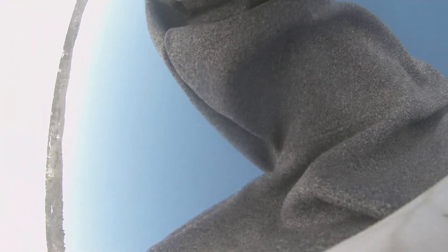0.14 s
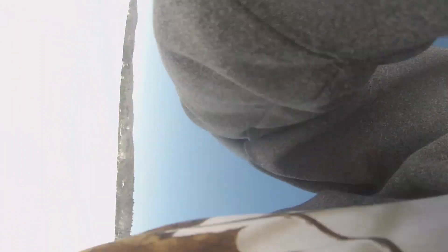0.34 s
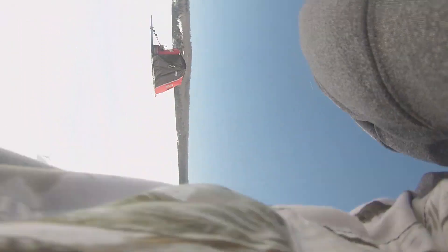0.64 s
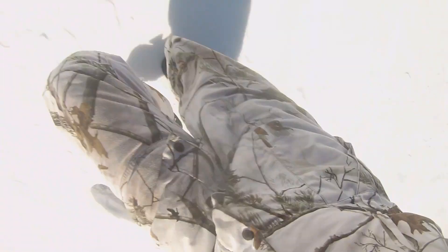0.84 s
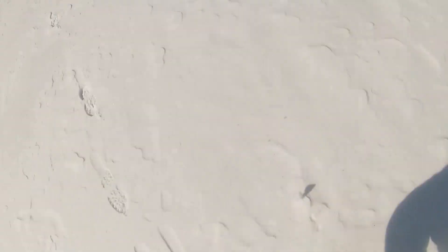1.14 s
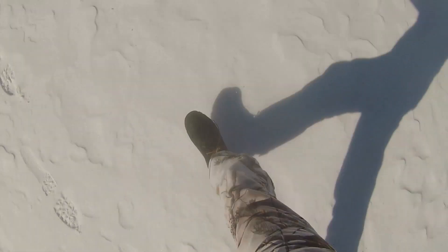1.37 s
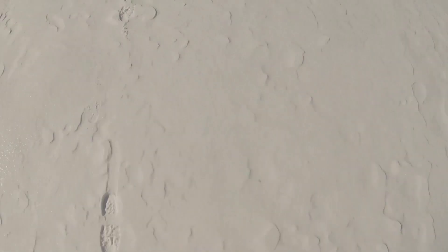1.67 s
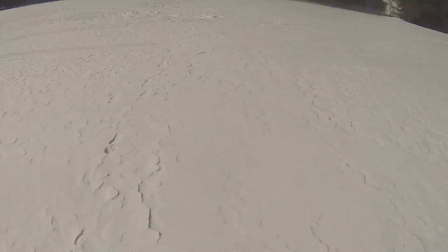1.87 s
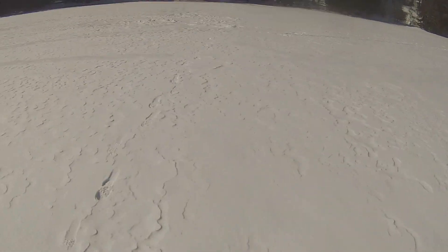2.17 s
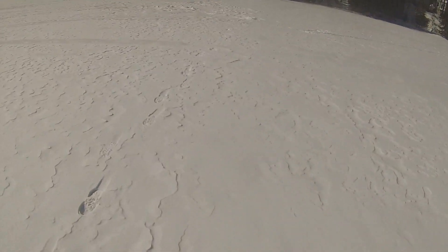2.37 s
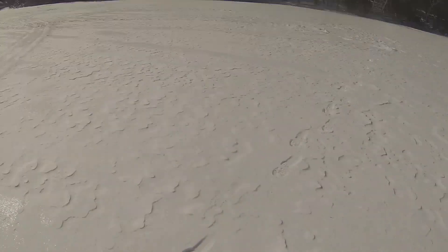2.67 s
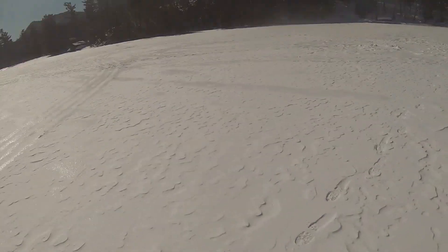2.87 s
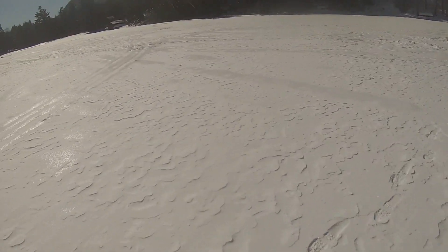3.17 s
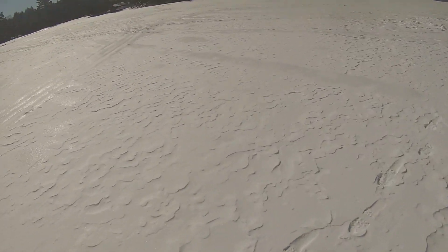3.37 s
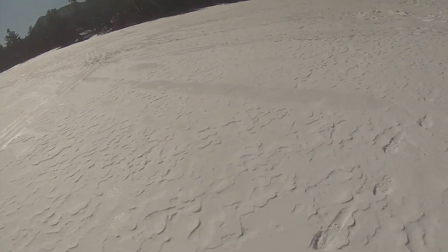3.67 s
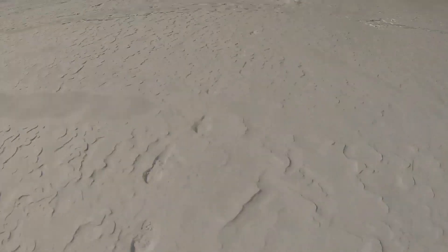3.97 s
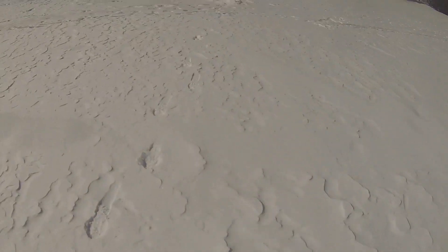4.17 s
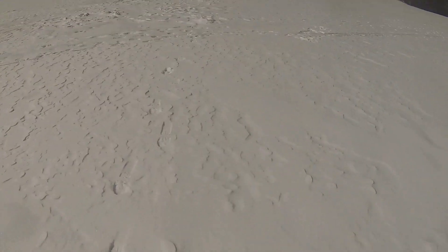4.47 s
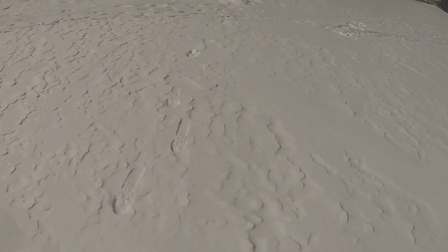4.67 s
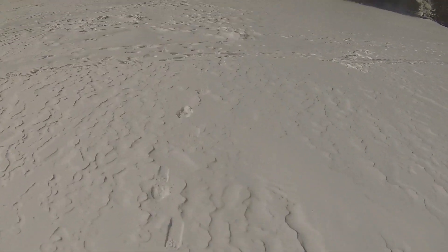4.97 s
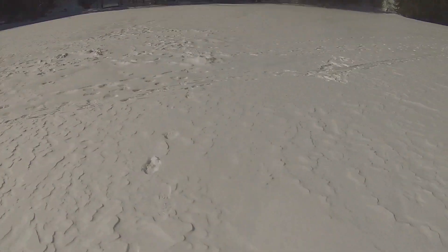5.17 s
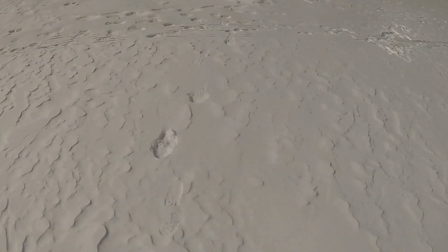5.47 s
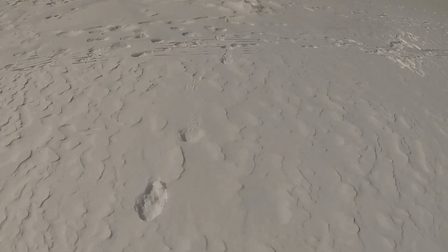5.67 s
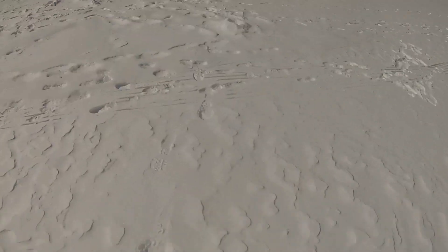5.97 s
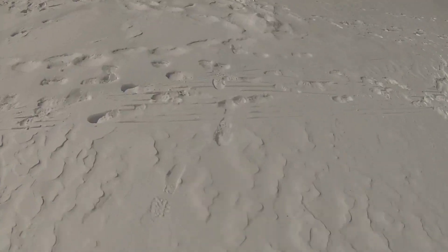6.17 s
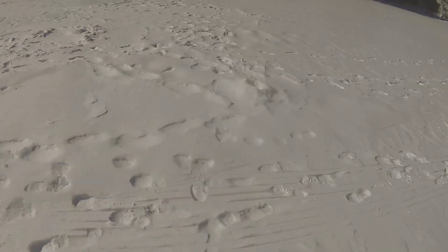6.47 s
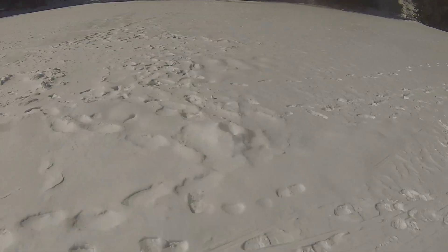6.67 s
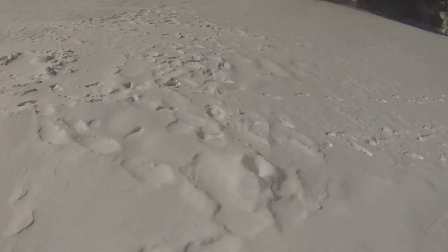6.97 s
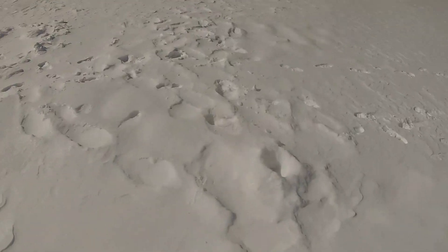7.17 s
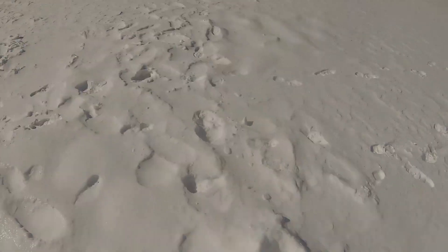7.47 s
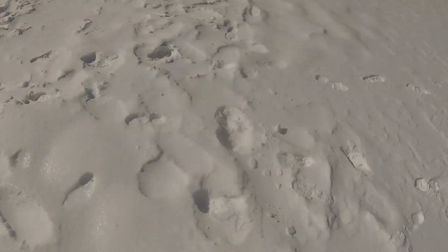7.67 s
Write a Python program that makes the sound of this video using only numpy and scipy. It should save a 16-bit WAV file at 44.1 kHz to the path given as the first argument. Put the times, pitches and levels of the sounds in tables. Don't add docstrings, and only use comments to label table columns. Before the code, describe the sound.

Close, boxy handling clatter and cloth rustle for two seconds, then uneven crunching steps on icy snow crust with low wind buffeting and sleeve swishes.

```python
import sys
import numpy as np
from scipy import signal
from scipy.fft import rfft, irfft, next_fast_len
from scipy.io import wavfile
from scipy.ndimage import uniform_filter1d

SR = 44100
rng = np.random.default_rng(int(sys.argv[2]) if len(sys.argv) > 2 else 0)


def put_to_file(sound):
    columns = np.atleast_2d(sound).T
    safe = np.clip(columns, -1, 1)
    whole_steps = np.round(safe * 32767)
    wavfile.write(sys.argv[1], SR, whole_steps.astype(np.int16))


def field_ratio(decibels):
    return 10 ** (np.asarray(decibels, dtype=float) / 20)


N = 345744


def evened(x):
    return x / np.sqrt(np.mean(x ** 2) + 1e-20)


def coloured(x, points):
    hz, db = np.transpose(points)
    size = next_fast_len(len(x))
    bins_hz = np.fft.rfftfreq(size, 1 / SR)
    gain = field_ratio(np.interp(np.log(bins_hz + 1), np.log(hz + 1), db))
    return evened(irfft(rfft(x, size) * gain, size)[:len(x)])


def curve_db(rows, column=1):
    columns = np.transpose(rows)
    return np.interp(np.arange(N) / SR, columns[0], columns[column])


def lumps(hz, db):
    lowpass = signal.butter(2, hz, fs=SR, output="sos")
    slow = signal.sosfilt(lowpass, rng.standard_normal(N))
    return evened(field_ratio(db * evened(slow)))


def patchy(x, db):
    spectrum = signal.stft(x, nperseg=256, noverlap=192)[2]
    field = rng.standard_normal(spectrum.shape)
    for bins, frames in [(5, 24), (3, 12)]:
        field = uniform_filter1d(uniform_filter1d(field, size=bins, axis=0), size=frames, axis=1)
    shaded = spectrum * field_ratio(db * evened(field))
    return evened(signal.istft(shaded, nperseg=256, noverlap=192)[1][:N])


def grains(per_s, spread_db):
    size = field_ratio(spread_db * np.minimum(rng.exponential(1, N), 4))
    return size * rng.standard_normal(N) * (rng.random(N) < per_s / SR)


def add(mix, s, sound, early=0):
    part = mix[max(round((s - early) * SR), 0):][:len(sound)]
    part += sound[:len(part)]


def wavelet(hz, cycles, phase):
    u = np.arange(1500) / SR * hz / cycles
    return (u * np.exp(1 - u)) ** 2 * np.sin(2 * np.pi * (u * cycles + phase))


# time in seconds, level in dB, deep share in dB.
WIND = [(0.0, -36.5, -7), (0.05, -30, -2), (0.3, -25.5, -3), (0.62, -34, 0), (0.84, -36, -0.5),
        (1.14, -45, -3), (1.58, -38, 1), (1.74, -36.5, 9.5), (1.88, -44, 5.5), (2.6, -37.5, 1),
        (2.98, -28, -6.5), (3.84, -29, -7.5), (4.54, -33, 0), (5.2, -39, 4), (5.5, -31, 1),
        (6.06, -28.5, -2.5), (6.64, -33.5, -1), (7.64, -24.5, -2)]
# middle in seconds, depth in dB, half length in seconds.
LULLS = [(0.176, 4.5, .1), (0.433, 11.5, 0.18), (0.986, 23, 0.12), (1.23, 20, 0.044), (1.357, 15, 0.24),
         (1.649, 30, 0.066), (1.802, 6, 0.061), (2.077, 11, 0.087), (2.476, 5.5, 0.089), (2.735, 16, 0.057),
         (2.836, 7, 0.12), (3.148, 7.5, 0.14), (3.512, 13.5, 0.23), (3.916, 29, 0.051), (4.01, 24.5, 0.096),
         (4.356, 13.5, 0.11), (5.074, 8, 0.13), (5.718, 8.5, 0.27), (5.816, 12, 0.12), (5.922, 8.5, 0.15),
         (6.23, 5.5, 0.15), (6.554, 14, 0.18), (7.333, 14, 0.14), (7.472, 9.5, 0.086), (7.788, 9.5, 0.23)]


def gusts():
    t = np.arange(N) / SR
    notches = sum(db * np.interp(t, [s - half, s, s + half], [0, 1, 0]) for s, db, half in LULLS)
    return curve_db(WIND) - notches


# frequency in Hz, density in dB per Hz.
WIND_COLOUR = [(12, -41), (20, -4), (48, 1.5), (83, -2), (155, -7), (414, -22), (513, -26.5), (600, -27),
               (780, -68), (1320, -120)]
# frequency in Hz, density in dB per Hz.
ROAR = [(180, -13), (300, -4.5), (614, -9.5), (725, -0.5), (1250, -16.5), (2070, -15.5), (2360, -11.5),
        (3640, -20), (4020, -25.5), (5610, -21.5), (7080, -36.5), (13500, -46), (16000, -51)]
# frequency in Hz, density in dB per Hz.
AIR = [(4120, -16.5), (7000, -12), (8070, -11.5), (11900, -18.5), (14700, -21.5), (15300, -28),
       (15600, -40)]


def wind():
    z = signal.stft(rng.standard_normal(N), nperseg=2048, noverlap=1536)[2]
    z = z / uniform_filter1d(abs(z) ** 2, size=14, axis=1) ** 0.4
    eddies = coloured(signal.istft(z, nperseg=2048, noverlap=1536)[1][:N], WIND_COLOUR)
    deep = signal.sosfiltfilt(signal.butter(2, 76.4, fs=SR, output="sos"), eddies)
    eddies = eddies + (field_ratio(curve_db(WIND, column=2)) - 1) * deep
    gust_db = gusts()
    rumble = field_ratio(gust_db) * eddies * lumps(hz=25.5, db=3.0)
    swish = patchy(coloured(grains(per_s=8700, spread_db=0.0), ROAR), db=2.0) * lumps(hz=27.3, db=2.0)
    swish_db = -55 + 0.15 * (gust_db + 24.5)
    hiss = field_ratio(-78.5) * coloured(rng.standard_normal(N), AIR)
    return rumble + field_ratio(swish_db) * swish + hiss


def layered(rows, heavy_share, coarse_db, fizz_db, fizz_slope):
    s, length, heavy, fine = np.transpose(rows)
    muffled = heavy - 1.6 * np.maximum(heavy + 32.5, 0)
    coarse = heavy_share * muffled + (1 - heavy_share) * fine + coarse_db
    fizz = fizz_db - fizz_slope * (fine + 50)
    return np.transpose([s, length, heavy, coarse, fine, fizz])


# frequency in Hz, density in dB per Hz.
HOLLOW = [(160, -11.5), (280, -5), (440, 0), (473, 1), (576, -5.5), (806, 0.5), (904, -5), (1400, -33.5),
          (1820, -28.5), (3080, -120)]
# frequency in Hz, density in dB per Hz.
GRIT = [(680, -10), (1150, -5), (1990, -4), (2500, -2.5), (3400, -22.5), (5500, -69)]


def friction(spells, fine_colour, breaks_per_s, spread_db, patchy_db, sag_db, body_db, soft):
    body, coarse, fine, top = np.zeros((4, N))
    for s, length, heavy_level, coarse_level, fine_level, fizz_level in spells:
        length = max(length, 0.002)
        edge = 0.003 + soft * length
        t = np.arange(0, length + edge, 1 / SR)
        fade = np.sin(np.pi / 2 * np.clip(np.minimum(t, t[-1] - t) / edge, 0, 1))
        spell = fade * field_ratio(sag_db * (t / t[-1] - 0.5))
        start = s - edge / 2
        add(body, start, field_ratio(heavy_level + body_db) * spell)
        add(coarse, start, field_ratio(coarse_level - 6.0) * spell)
        add(fine, start, field_ratio(fine_level - 3.0) * spell)
        add(top, start, field_ratio(fine_level + fizz_level) * spell)
    breaks = evened(grains(breaks_per_s, spread_db))
    small = evened(grains(per_s=13000, spread_db=-1.5)) + 0.067 * spread_db * breaks
    low = body * coloured(breaks, HOLLOW) + coarse * coloured(breaks + 1.7 * small, GRIT)
    high = fine * patchy(coloured(small, fine_colour), patchy_db)
    fizz = top * patchy(coloured(small, AIR), db=3.0)
    return low + high + fizz


# frequency in Hz, density in dB per Hz.
WEAVE = [(1470, -12.5), (2600, -3), (3680, -3), (4240, -3.5), (4800, -9.5), (5760, -5), (7300, -33.5),
         (9490, -87), (16100, -120)]
# start in seconds, pressure
# in dB, slip in dB.
RUBS = [(0.0, -44, -50), (0.03, -39.5, -41), (0.162, -28.5, -37), (0.267, -26, -37.5), (0.326, -34, -26),
        (0.34, -27, -41), (0.351, -31, -31), (0.365, -38, -26), (0.418, -37, -34), (0.547, -37.5, -29),
        (0.592, -37, -33), (0.659, -31.5, -32), (0.704, -44, -28), (0.738, -37, -46.5),
        (0.771, -43.5, -51), (0.805, -33.5, -32), (0.844, -40, -34), (0.901, -53.5, -49),
        (0.995, -64, -61),
        (1.024, -43, -48.5), (1.06, -49, -57), (1.098, -33.5, -44), (1.125, -26.5, -35.5),
          (1.146, -36, -36), (1.187, -43.5, -45.5), (1.228, -40, -41), (1.239, -42.5, -42),
          (1.268, -43.5, -54), (1.315, -36, -34.5), (1.348, -43, -40.5), (1.371, -48, -53.5),
          (1.401, -37, -44), (1.479, -36, -40), (1.537, -32.5, -34), (1.571, -30.5, -44), (1.585, -45, -53),
          (1.626, -40, -42.5), (1.685, -39.5, -34), (1.712, -29.5, -26.5), (1.761, -30.5, -38.5),
          (1.789, -49, -54), (1.825, -27, -35), (1.835, -39.5, -37.5), (1.861, -53, -52.5),
          (1.89, -82, -82)]
# start in seconds, length in seconds, pressure in dB, slip in dB.
SWISHES = [(2.063, 0.062, -84, -57.5), (2.325, 0.024, -65, -67), (2.8, 0.077, -46.5, -59.5),
           (3.57, 0.087, -45.5, -60.5), (3.795, 0.041, -42, -53), (3.925, 0.099, -56, -61),
           (4.225, 0.031, -68, -54.5), (4.36, 0.06, -43.5, -56), (4.72, 0.077, -46, -62),
           (5.005, 0.056, -48.5, -59.5), (5.116, 0.076, -44, -56.5), (5.345, 0.047, -61, -55.5),
           (5.705, 0.062, -50, -57), (5.866, 0.038, -45.5, -53.5), (6.11, 0.056, -45, -60.5),
           (6.22, 0.074, -45.5, -61), (7.116, 0.053, -60, -57), (7.242, 0.047, -43.5, -55.5),
           (7.384, 0.048, -45.5, -50.5), (7.647, 0.047, -44.5, -55), (7.74, 0.081, -46, -59)]


def rubbing():
    strokes = np.array(RUBS, float)
    starts = strokes[:, 0]
    lengths = np.diff(starts, append=starts[-1] + 0.06)
    strokes = np.insert(strokes, 1, lengths, axis=1)
    strokes = layered(strokes, heavy_share=1.0, coarse_db=-5.5, fizz_db=-13.5, fizz_slope=0.012)
    swishes = layered(SWISHES, heavy_share=0.41, coarse_db=-1.0, fizz_db=-15.0, fizz_slope=0.07)
    cloth = friction(np.vstack([strokes, swishes]), WEAVE, breaks_per_s=2000, spread_db=-2.0,
                     patchy_db=2.7, sag_db=-0.1, body_db=-4.0, soft=0.12)
    return cloth * lumps(hz=29.3, db=1.94)


def hollow_rings(rows):
    ring, rattle, t = np.zeros(N), np.zeros(N), np.arange(1500) / SR
    for (s, db, hz), phase in zip(rows, rng.random((len(rows), 1))):
        add(ring, s, field_ratio(db - 1.5) * wavelet(hz, cycles=0.83, phase=phase), early=1.189 / hz)
        add(rattle, s + 0.00097, field_ratio(db - 11.5 - 60 * t / 0.025) * np.minimum(t / 0.00077, 1))
    return ring + rattle * coloured(grains(per_s=2600, spread_db=0.2), HOLLOW)


# time in seconds, peak in dB, ring in Hz.
KNOCKS = [(0.0185, -25.5, 507), (0.0315, -23.5, 705), (0.0355, -22, 700), (0.1601, -25, 735),
          (0.1686, -24, 580), (0.1792, -16, 690), (0.184, -22, 770), (0.1922, -22.5, 664),
          (0.1958, -26, 565), (0.2209, -25, 645), (0.2251, -15, 790), (0.2295, -35, 570),
          (0.2657, -12.5, 507), (0.2701, -11.5, 616), (0.2782, -26, 685), (0.2851, -24, 553),
          (0.2889, -21, 617), (0.2968, -30, 720), (0.3037, -25, 630), (0.3095, -26, 600),
          (0.3201, -17, 550), (0.3267, -34, 706), (0.3346, -22, 660), (0.3392, -18.5, 565),
          (0.3787, -21, 600), (0.388, -24, 840), (0.4436, -23, 730), (0.4478, -22.5, 640),
          (0.5262, -21.5, 736), (0.5496, -22.5, 643), (0.6294, -14, 670), (0.6629, -22, 696),
          (0.6678, -28, 670), (0.6724, -32, 714), (0.6793, -23, 780), (0.6836, -25.5, 720),
          (0.7174, -15.5, 710), (0.7308, -18.5, 970), (0.7642, -21.5, 640), (0.8061, -18.5, 794),
          (0.8279, -34, 640), (0.8366, -17.5, 766), (0.8971, -30, 980), (1.0995, -16, 633),
          (1.1276, -12, 710), (1.1345, -7, 620), (1.1425, -30, 660), (1.1801, -25, 690),
          (1.2285, -14.5, 740), (1.2364, -20, 780), (1.5392, -16.5, 470), (1.712, -35, 604),
          (1.721, -28.5, 485), (1.7318, -31, 645), (1.7567, -24, 634), (1.7814, -15.5, 594),
          (1.7855, -18, 540), (1.8302, -18.5, 860)]


def knocks():
    return hollow_rings(KNOCKS)


# time in seconds, peak in dB, ring in Hz.
TICKS = [(0.033, -24.5, 2430), (0.224, -25, 3630), (0.6625, -24, 1600), (0.7635, -34, 1610),
         (0.868, -26, 3160), (0.7313, -20, 1600), (0.806, -15.5, 1690), (0.897, -7, 2200),
         (0.8979, -23, 2100), (1.024, -28, 2740), (1.04, -17.5, 2020), (1.057, -28, 2390),
         (1.1002, -29, 1950), (1.1263, -19.5, 1400), (1.2268, -20.5, 1400), (1.2295, -16, 3000),
         (1.335, -22.5, 1750), (1.5344, -23.5, 1820), (1.78, -18.5, 1680), (1.8247, -15.5, 4560),
         (1.829, -14, 2760), (1.8314, -12.5, 2320), (1.8345, -21, 2600), (1.8795, -41, 3300),
         (1.853, -24.5, 2860), (2.619, -23.5, 2290), (2.6513, -32, 3130), (2.8658, -40, 2600),
         (3.202, -43.5, 1830), (4.046, -39.5, 1600), (4.464, -47, 1500), (5.1515, -40.5, 1690),
         (5.896, -37.5, 3220), (5.958, -35.5, 2150), (7.397, -41, 3000), (7.411, -31, 3220),
         (7.477, -36.5, 1960), (7.801, -26.5, 3300)]


def ticks():
    ring, snap, t = np.zeros(N), np.zeros(N), np.arange(1500) / SR
    for (s, db, hz), phase in zip(TICKS, rng.random((len(TICKS), 1))):
        add(ring, s - 0.0004, field_ratio(db + 1.05) * wavelet(hz, cycles=1.24, phase=phase))
        snap_db = 1.15 * db - 0.6 - 60 * t / 0.0045
        add(snap, s - 0.0002, field_ratio(snap_db) * np.minimum(t / 0.00025, 1) ** 2)
    return ring + snap * coloured(rng.standard_normal(N), WEAVE)


# time in seconds, peak in dB.
THUDS = [
    (0.624, -21),
    (2.778, -27),
    (4.534, -24.5),
    (5.489, -36),
]


def thuds():
    out = np.zeros(N)
    for (s, db), phase in zip(THUDS, rng.random((len(THUDS), 1))):
        add(out, s, field_ratio(db) * wavelet(hz=237, cycles=0.86, phase=phase))
    return out


# time in seconds, peak in dB.
PINGS = [(1.824, -24), (2.221, -48), (3.238, -50), (3.352, -40.5), (3.646, -51), (3.999, -46),
         (5.151, -42.5), (7.517, -42.5), (7.805, -47), (7.818, -40), (7.828, -41)]


def pings():
    ping, t = np.zeros(N), np.arange(1500) / SR
    for s, db in PINGS:
        add(ping, s, field_ratio(db - 60 * t / 0.0057))
    return ping * coloured(rng.standard_normal(N), AIR)


# frequency in Hz, density in dB per Hz.
FINE = [(1470, -22), (2500, 5.5), (3400, 9), (4000, -1.5), (4600, -0.5), (5550, 2.5), (7300, -10),
        (9490, -55), (16100, -120)]
# start in seconds, length in seconds, weight in dB, spray in dB.
SNAPS = [(2.223, 0.012, -51, -48.5), (2.609, 0.02, -33, -55), (2.666, 0.022, -36, -50),
         (2.777, 0.011, -44, -51.5), (3.037, 0.015, -33.5, -57), (3.326, 0.002, -20, -47),
         (6.828, 0.013, -41.5, -56.5), (3.447, 0.015, -33.5, -55.5), (4.196, 0.018, -33, -52),
         (4.476, 0.02, -44, -50), (4.527, 0.021, -39.5, -54.5), (4.634, 0.013, -30, -57.5),
         (4.676, 0.011, -40.5, -63), (4.947, 0.016, -33.5, -52.5), (4.986, 0.014, -44, -55),
         (5.377, 0.029, -34, -52), (5.595, 0.039, -41, -52.5), (5.655, 0.021, -34.5, -50.5),
         (5.985, 0.015, -35, -48.5), (6.038, 0.016, -31.5, -48.5), (6.086, 0.016, -35, -49),
         (6.307, 0.0045, -59, -46.5), (6.449, 0.016, -31.5, -50), (6.512, 0.0085, -24, -55),
         (6.624, 0.023, -39, -58), (6.758, 0.017, -46, -53), (6.8, 0.011, -35, -52.5),
         (7.2, 0.013, -39, -41.5), (7.801, 0.0016, -32, -40.5)]
# start in seconds, length in seconds, weight in dB, spray in dB.
CRUSHES = [(2.686, 0.021, -47, -62), (2.714, 0.011, -31, -55), (3.359, 0.031, -33, -52),
           (3.392, 0.036, -37, -61), (3.848, 0.012, -39, -55), (4.111, 0.07, -32, -51.5),
           (4.255, 0.019, -31, -54), (4.556, 0.013, -41, -54.5), (4.583, 0.015, -38, -57),
           (4.694, .008, -38, -57), (4.877, 0.055, -39.5, -53.5), (5.235, 0.025, -38, -48),
           (5.255, 0.024, -36, -62), (5.281, 0.022, -25, -45.5), (5.308, 0.017, -24, -47),
           (5.329, 0.031, -34.5, -61), (6.367, 0.027, -41, -55), (6.41, 0.032, -39, -50.5)]
# start in seconds, length in seconds, weight in dB, spray in dB.
GRINDS = [
    (2.958, 0.064, -38, -64),
    (3.08, 0.048, -40, -63),
    (6.003, 0.029, -49, -67),
    (7.501, 0.071, -33.5, -54),
    (7.592, 0.026, -30.5, -54),
]


def running():
    settle_s, settle_weight_db, settle_spray_db = 0.033, -25, -19
    settles = [(s + length, settle_s, weight + settle_weight_db, spray + settle_spray_db)
               for s, length, weight, spray in SNAPS]
    snaps = layered(SNAPS + settles, heavy_share=0.22, coarse_db=3.0, fizz_db=-12.0, fizz_slope=0.1)
    crushes = layered(CRUSHES, heavy_share=0.57, coarse_db=-2.5, fizz_db=-12.0, fizz_slope=0.075)
    grinds = layered(GRINDS, heavy_share=0.56, coarse_db=3.5, fizz_db=-11.5, fizz_slope=0.1)
    snow = friction(np.vstack([snaps, crushes, grinds]), FINE, breaks_per_s=900, spread_db=2.0,
                    patchy_db=5.5, sag_db=-1.0, body_db=-5.5, soft=0.039)
    return snow * lumps(hz=56.5, db=2.5)


# time in seconds, peak in dB, ring in Hz.
CRACKS = [(2.6136, -17, 636), (2.62, -12, 715), (2.6687, -19, 615), (2.6721, -26, 590), (2.6787, -23, 544),
          (2.7818, -24, 724), (2.9578, -29, 624), (3.006, -25.5, 634), (3.0484, -30, 666),
          (3.0989, -28, 650), (3.112, -29, 664), (3.1177, -27.5, 580), (3.3281, -25, 590),
          (3.3335, -28, 566), (3.3457, -31.0, 750), (3.3616, -23, 590), (3.3656, -18, 600),
          (3.3692, -16.5, 706), (3.3779, -22, 620), (3.386, -29, 694), (3.502, -29, 560),
          (3.5721, -29.5, 494), (3.8574, -23.5, 646), (4.1136, -12, 540), (4.12, -22, 660),
          (4.1277, -10.5, 604), (4.1347, -36, 666), (4.1416, -19, 630), (4.154, -19, 740),
          (4.1616, -18, 716), (4.1667, -26.0, 715), (4.191, -23, 676), (4.2074, -19, 720),
          (4.2634, -29, 740), (4.271, -36, 730), (4.4937, -23, 603), (4.5284, -23.5, 740),
          (4.5392, -18.5, 785), (4.5612, -25, 680), (4.5655, -29, 660), (4.5865, -29, 840),
          (4.637, -26, 690), (4.8826, -15.5, 580), (4.8944, -22, 530), (4.9105, -28, 560),
          (4.917, -25, 527), (4.9216, -30, 620), (4.9596, -32, 710), (4.9903, -29, 646), (4.9969, -32, 690)]
# time in seconds, peak in dB, ring in Hz.
LATE_CRACKS = [(5.14, -30, 550), (5.2388, -17, 710), (5.2545, -28, 875), (5.2725, -28, 866),
               (5.2849, -21.5, 625), (5.2924, -17, 850), (5.3127, -18.5, 714), (5.3196, -23, 860),
               (5.3235, -27, 900), (5.3536, -30.0, 750), (5.3845, -22.5, 830), (5.388, -20, 864),
               (5.6091, -20, 580), (5.6177, -25, 650), (5.9917, -23.5, 544), (6.0392, -27, 856),
               (6.0517, -29, 890), (6.0922, -31, 610), (6.3723, -19, 630), (6.3837, -28, 860),
               (6.3938, -28, 810), (6.417, -23.5, 740), (6.4534, -32, 680), (6.46, -27, 815),
               (6.5151, -36, 590), (6.5187, -32.0, 720), (6.6337, -31, 500), (6.7635, -25, 630),
               (7.1283, -25.5, 790), (7.2016, -24, 620), (7.2074, -15, 805), (7.2774, -30, 670),
               (7.2873, -33.5, 610), (7.3976, -32, 740), (7.507, -21.5, 700), (7.5118, -32, 560),
               (7.5165, -26, 454), (7.5215, -26, 520), (7.5573, -19.5, 745), (7.5932, -31, 690),
               (7.5982, -26, 785), (7.6033, -25, 726), (7.6143, -26, 780)]


def cracks():
    spray, t = np.zeros(N), np.arange(1500) / SR
    for s, db, hz in CRACKS + LATE_CRACKS:
        add(spray, s, field_ratio(0.73 * db - 35.5 - 60 * t / 0.011))
    crystals = coloured(grains(per_s=5000, spread_db=-0.5), FINE)
    return hollow_rings(CRACKS + LATE_CRACKS) + spray * crystals


# time in seconds, peak in dB.
SPLINTERS = [(3.004, -35), (3.0488, -28.5), (3.099, -39.5), (3.114, -33), (3.365, -44), (3.37, -36.5),
             (4.208, -40), (4.5356, -37), (5.24, -40), (5.2856, -43), (5.2954, -34), (5.2976, -37),
             (5.31, -36), (5.319, -37), (5.3904, -32), (5.6183, -34), (5.6652, -32), (5.9596, -34),
             (5.9917, -29), (6.0394, -35), (6.0517, -32), (6.0929, -28), (6.383, -30), (6.3941, -36),
             (6.452, -32), (6.4592, -37), (7.211, -36), (7.4105, -37), (7.4785, -34), (7.508, -34),
             (7.5206, -44), (7.5415, -30), (7.551, -31), (7.5582, -25), (7.5657, -42), (7.571, -26),
             (7.5925, -31), (7.601, -26), (7.614, -28)]


def splinters():
    out = np.zeros(N)
    for (s, db), (phase, size) in zip(SPLINTERS, rng.random((len(SPLINTERS), 2))):
        hz = 1550 * (0.79 + 0.27 * size)
        add(out, s - 0.0008, field_ratio(db - 4.0) * wavelet(hz, cycles=1.3, phase=phase))
    return out


# centre in Hz, width in Hz, gain in dB.
SHELL = [
    (1900, 67, -3),
    (2520, 570, -4),
    (3620, 104, 3),
    (5670, 144, 1.5),
    (6640, 110, 4.5),
]


def shell(x):
    hz = np.fft.rfftfreq(N, 1 / SR)
    gain_db = sum(db / (1 + (2 * (hz - centre) / width) ** 2) for centre, width, db in SHELL)
    return irfft(rfft(x) * field_ratio(gain_db), N)


def scene():
    handling = rubbing() + knocks() + ticks() + thuds()
    snow = pings() + running() + cracks() + splinters()
    return (wind() + handling + snow)[None]


def roll_off(x):
    return signal.sosfilt(signal.butter(12, 16440, fs=SR, output="sos"), x)


def record(dry):
    band_limit = signal.firwin(511, 15900, window=("kaiser", 9), fs=SR)
    limited = signal.oaconvolve(shell(dry[0])[None], band_limit[None], "same")
    return roll_off(limited)


dry = scene()
out = record(dry)
put_to_file(out)
```